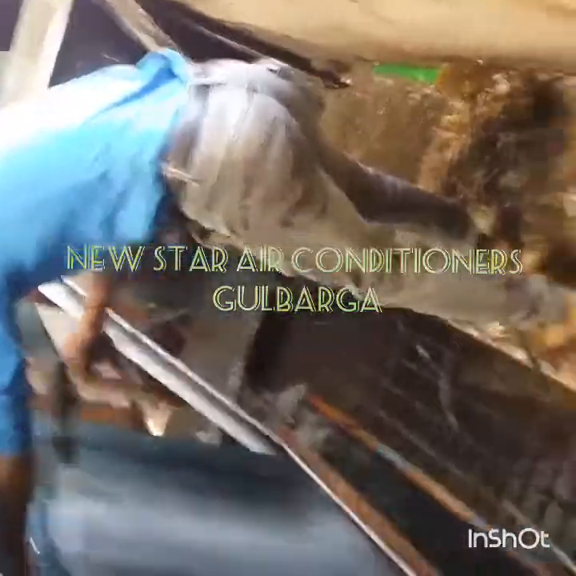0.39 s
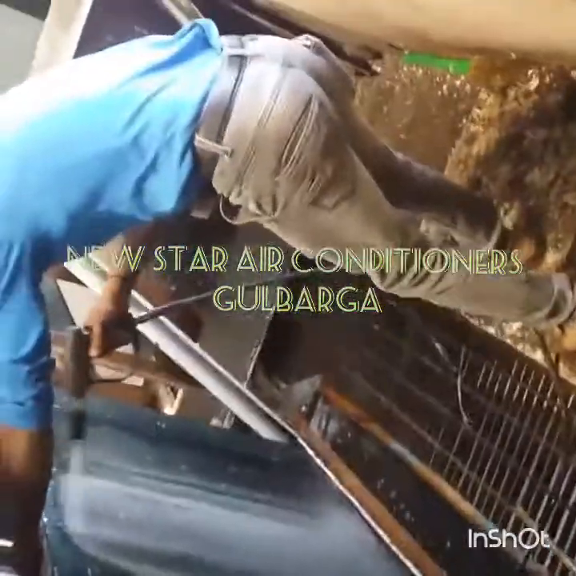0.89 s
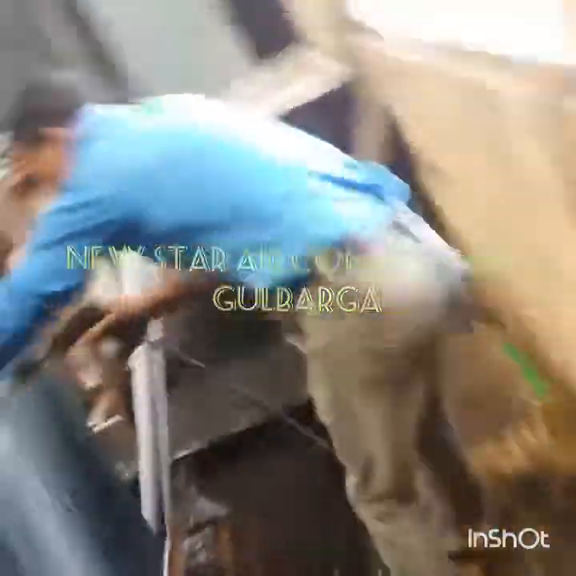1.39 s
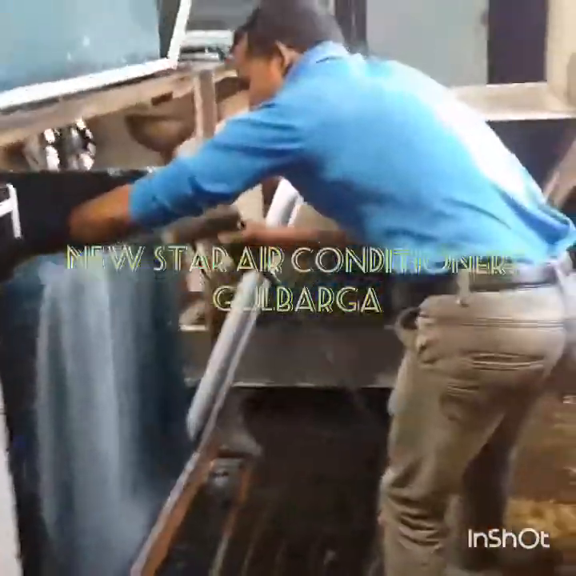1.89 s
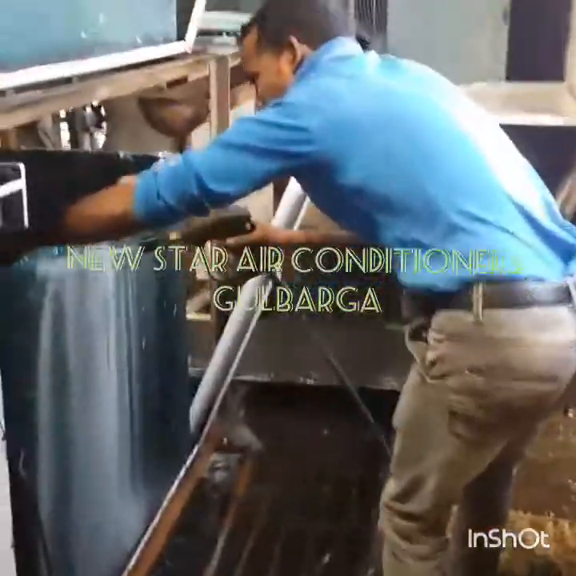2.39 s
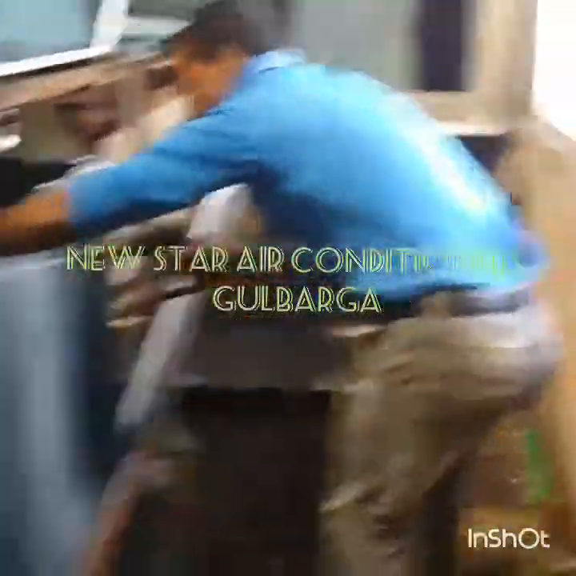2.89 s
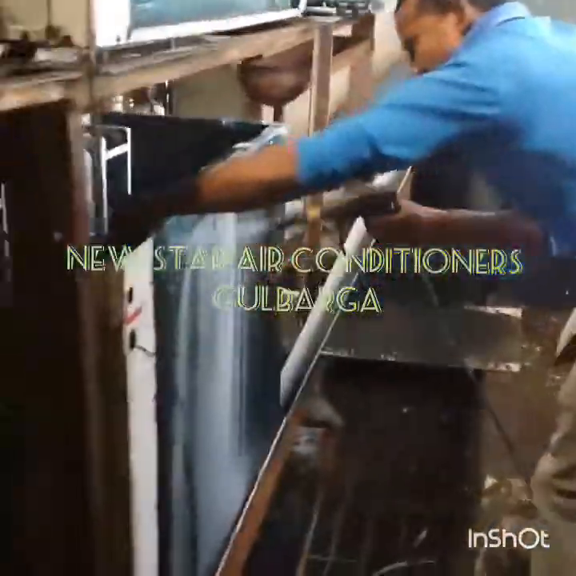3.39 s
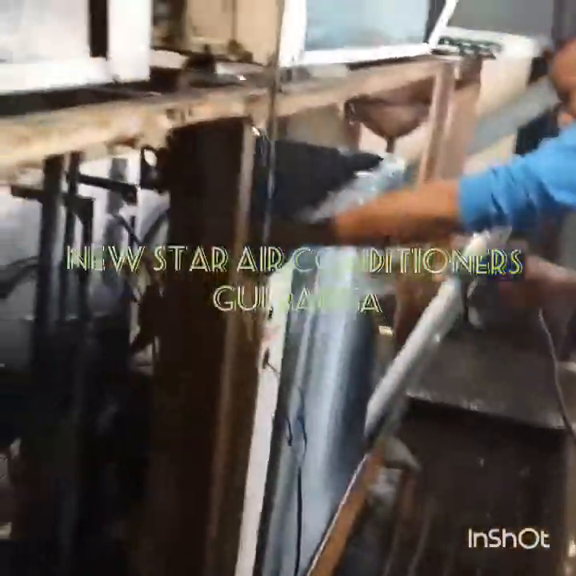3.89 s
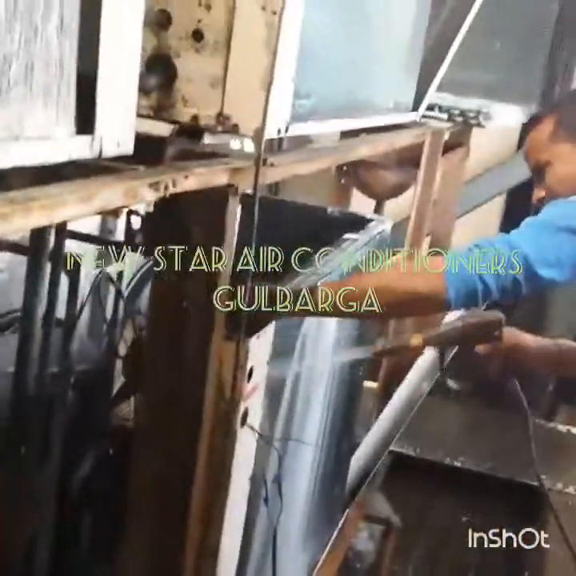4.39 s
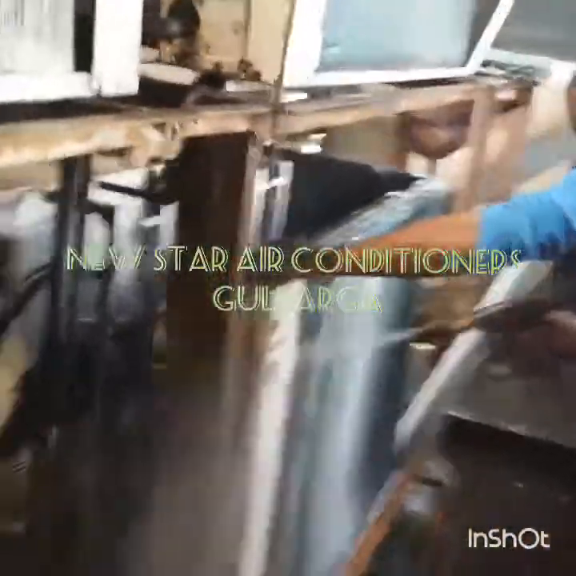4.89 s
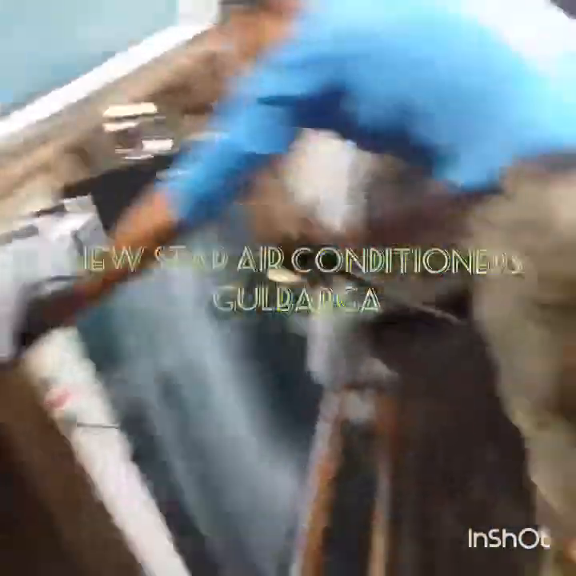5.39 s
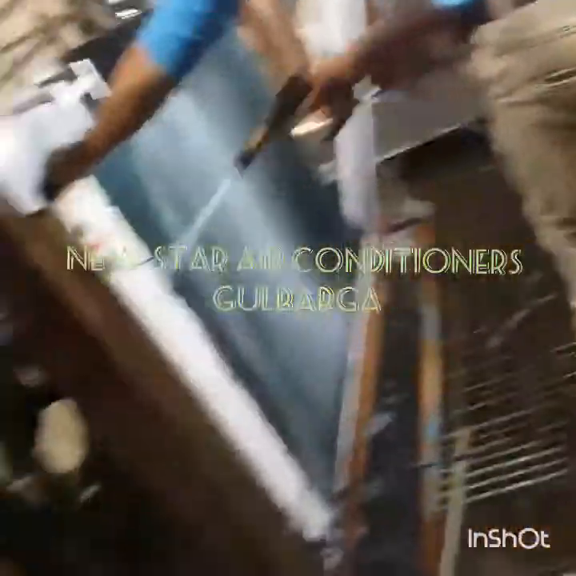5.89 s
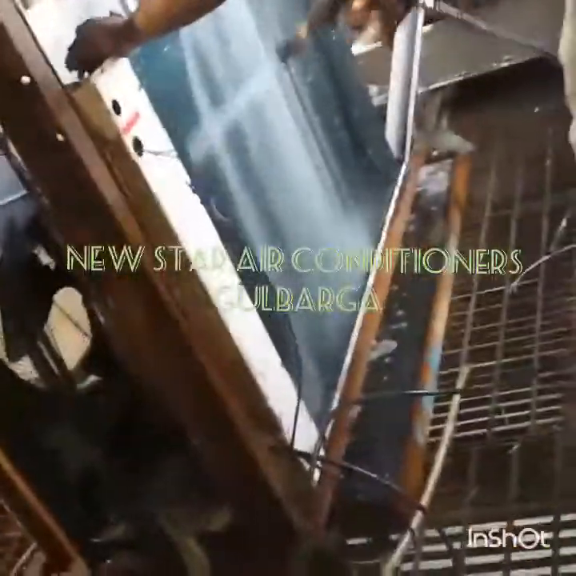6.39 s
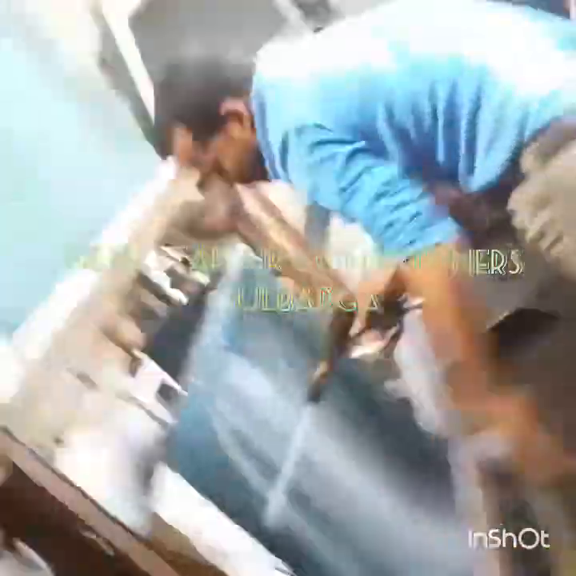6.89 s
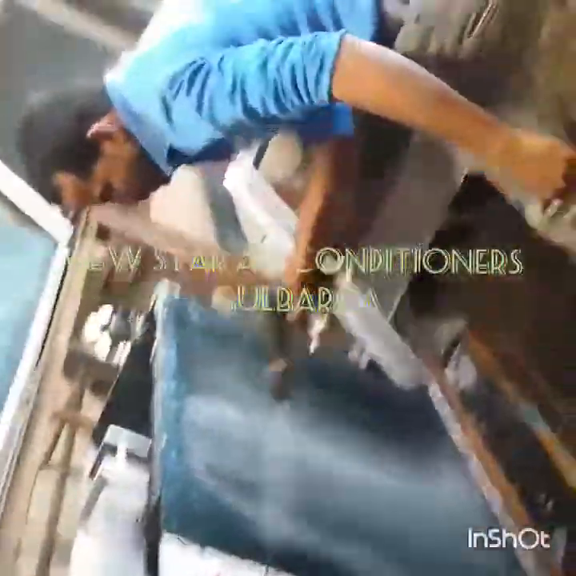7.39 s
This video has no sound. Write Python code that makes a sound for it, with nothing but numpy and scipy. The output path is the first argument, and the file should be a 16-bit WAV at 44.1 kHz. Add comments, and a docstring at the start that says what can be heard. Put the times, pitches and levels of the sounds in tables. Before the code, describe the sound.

A pressurised water jet hisses brightly over thin metal fins, briefly drumming on a sheet-metal casing, with run-off and a humming, whining pump behind.

```python
"""A hand sweeps a pressure washer's jet over the thin fins of an air conditioner coil, near a moving phone.
From the start, noise shaped into bands gives the hiss on the fins, the fizz of mist and the run-off;
behind it lie workshop noise and a pump made of steady sine tones. The hiss dips briefly, mostly early on.
Between 4.7 and 6 s the jet slips off the fins four times and the metal casing, a set of resonances, drums.
The hiss then goes on without the drumming, over run-off, workshop noise and pump; a low swell ends it."""
import sys
import numpy as np
from scipy import signal
from scipy.fft import rfft, irfft, next_fast_len
from scipy.io import wavfile
from scipy.ndimage import uniform_filter1d, map_coordinates

SR = 44100
rng = np.random.default_rng(int(sys.argv[2]) if len(sys.argv) > 2 else 0)


def master_out(mix):
    """Clip the mix to full scale and print it as 16-bit PCM to the path in sys.argv[1]."""
    frames = np.transpose(np.atleast_2d(mix))
    ceiling = np.clip(frames, -1, 1)
    pcm = np.round(ceiling * 32767).astype(np.int16)
    wavfile.write(sys.argv[1], SR, pcm)


def boost(x):
    """Linear amplitude factor 10**(x/20) for a level x in decibels (scalar or array-like)."""
    u = np.asarray(x, float) / 20
    return 10 ** u


N = 331191  # length in samples
T = np.arange(N) / SR  # time in s
SHAFT_HZ = 48.692  # turns of the pump shaft per second


def read(table):
    """Join the rows of a table by straight lines in time, one curve per column."""
    s, *columns = np.transpose(table)
    return [np.interp(T, s, column) for column in columns]


def over_hz(table, hz):
    """Read a spectrum with pitch spaced by ratio, much as the ear hears it."""
    table_hz, values = np.transpose(table)
    return np.interp(np.log(hz + 1), np.log(table_hz), values)


def walk(rate, count=1):
    """Slow random wandering: a new random level each 1 / rate s, joined by ramps; spread a little over 1."""
    hold = int(SR / rate)
    levels = rng.standard_normal((count, N // hold + 1))
    steps = np.repeat(levels, hold, axis=1)
    return 1.42 * uniform_filter1d(steps, hold, axis=1)[:, :N]


def noise():
    """Two unrelated channels of plain hiss."""
    return rng.standard_normal((2, N))


def droplets(spread_db):
    """Two unrelated showers with an impact at every sample, some harder than the rest."""
    hardness = np.minimum(rng.exponential(size=(2, N)), 5)
    return noise() * boost(spread_db * hardness)


def colour(x, table):
    """Filter two channels to a spectrum, then set each to rms 1."""
    size = next_fast_len(N)
    gain = boost(over_hz(table, np.fft.rfftfreq(size, 1 / SR)))
    y = irfft(rfft(x, size) * gain, size)[:, :N]
    return y / y.std(axis=1, keepdims=True)


def patches(x, depth_db, wide_hz, long_s):
    """Random bright and dull streaks in pitch and time, so that the noise has an uneven grain."""
    hz, s, z = signal.stft(x, SR, nperseg=1024, noverlap=768)
    grids = rng.standard_normal((2, 400, 400))
    place = np.meshgrid(hz / wide_hz, s / long_s, indexing="ij")
    streaks = np.array([map_coordinates(grid, place, order=1) for grid in grids])
    return signal.istft(z * boost(depth_db * streaks), SR, nperseg=1024, noverlap=768)[1][:, :N]


def ring(x, hz, width_hz):
    """One resonance, passing its centre pitch unchanged and weakening the rest."""
    return signal.lfilter(*signal.iirpeak(hz, hz / width_hz, SR), x)


def bumps(rows):
    """Smooth bumps in dB from rows of (t/s, level/dB, half length/s)."""
    return sum(db * np.exp(-((T - s) / long_s) ** 2) for s, db, long_s in rows)


# the jet slips off the fins onto the casing: leaves t/s, returns t/s, change on the fins level/dB,
# drumming level/dB, brightness in dB per octave
SLIPS = [(4.717, 5.28, -7.5, -39.5, -3), (5.454, 5.53, -10.5, -36, 5), (5.666, 5.757, -11, -38, -2),
         (5.922, 6.005, -9, -33.5, 7)]
SLIDE_S = 0.063  # time the jet takes to cross the edge
DRUM_LEAD_S, DRUM_TAIL_S = 0.02, 0.033  # the casing drums a little longer than the fins are quiet


def slipped(lead_s=0, tail_s=0):
    """For each slip a gate, 1 while the jet is off the fins, with ramps as it crosses the edge."""
    def edge(s):
        return np.clip(s / SLIDE_S + .5, 0, 1)
    return np.array([edge(T - off + lead_s) * edge(back + tail_s - T) for off, back, *_ in SLIPS])


# surroundings: t/s, low rumble level/dB, workshop murmur level/dB, wash level/dB
SURROUNDINGS = [(0.0, -49, -41.5, -42), (1.0, -44.5, -49, -42), (2.42, -48.5, -46.5, -40.5),
                (3.3, -62, -53, -46), (4.43, -69, -51, -46.5), (5.31, -57, -51, -45.5),
                (6.38, -60, -51, -40.5), (7.51, -58, -46, -42)]
# colours of the rumble, the murmur and the wash: f/Hz, relative level/dB
LOWS_COLOUR = [(25, -36), (45, -23), (65, 1.5), (100, -1), (140, -5), (250, -6.5), (500, -26.5)]
MURMUR_COLOUR = [(80, -19), (150, -5.5), (250, -4), (350, -1.5), (480, -1.5), (700, -17), (1200, -21)]
WASH_COLOUR = [(350, -27), (560, -7.5), (800, 1), (1050, 3.5), (1300, -1.5), (1700, -7), (2500, -28)]
# one low swell: t/s, f/Hz, gain level/dB, half length/s
SWELL = (7.45, 296, -20, .05)


def rumble():
    """Dull wavering noise at the bottom, the murmur and wash of the wet workshop, and one low swell."""
    lows_db, murmur_db, wash_db = read(SURROUNDINGS)
    lows = colour(noise(), LOWS_COLOUR) * boost(lows_db + .7 * walk(3.05))
    murmur = colour(patches(noise(), depth_db=4.5, wide_hz=86.6, long_s=0.329), MURMUR_COLOUR)
    wash = colour(patches(noise(), depth_db=5.25, wide_hz=90.3, long_s=.2), WASH_COLOUR)
    wash_db = wash_db + 0.5 * slipped().max(axis=0)  # slightly louder while the jet is on the casing
    s, hz, db, long_s = SWELL
    swell = ring(noise(), hz, 90) * boost(db) * np.exp(-((T - s) / long_s) ** 2)
    return lows + murmur * boost(murmur_db) + wash * boost(wash_db) + swell


# how strongly the pump is heard: t/s, added hum level/dB, added whine level/dB
PUMP_NEARNESS = [(0, 11, 7), (1.2, 6, 5), (2.2, 4, 7), (3.2, 2.5, 4.5), (4.2, 2.5, -0.5), (5.2, 1, 3),
                 (6.2, -1, 1), (7.51, 6.5, 7)]
# the pump's tones: multiple of the shaft rate, level/dB before the nearness is added
PUMP_TONES = [(2, -65), (3, -63), (4, -65), (5, -63), (6, -63), (7, -59), (8, -64), (9, -61), (11, -65),
              (12, -61), (14, -61), (17, -61), (18, -60), (26, -60), (27, -58), (28, -62), (31, -56),
              (32, -58), (33, -52), (34, -49), (35, -54), (36, -58), (37, -51), (38, -50), (39, -56),
              (40, -52), (41, -57), (42, -58), (43, -58), (46, -60), (47, -55), (50, -58)]


def pump():
    """Steady multiples of the shaft rate; each swells and fades as the phone moves among the echoes."""
    shaft_angle = 2 * np.pi * SHAFT_HZ * T
    hum_db, whine_db = read(PUMP_NEARNESS)
    out = np.zeros((2, N))
    for multiple, db in PUMP_TONES:
        high = min(multiple / 30, 1)  # near 0 for hum, 1 for whine
        # short waves differ between the ports and favour the left one
        start = rng.uniform(0, 2 * np.pi) + high * rng.uniform(-np.pi / 2, np.pi / 2, (2, 1))
        near_db = (1 - high) * hum_db + high * (whine_db + np.array([[.8], [-3.]]))
        fading_db = (1.5 + 0.97 * high) * walk(1.226, count=2)
        out += boost(db + near_db + fading_db) * np.sin(multiple * shaft_angle + start)
    return out


# run-off: t/s, trickle level/dB, splash level/dB
RUN_OFF = [(0.0, -34, -31.5), (1.38, -34, -33.5), (1.82, -31.5, -30.5), (2.3, -33.7, -27.5),
           (2.89, -35, -30), (3.25, -34.5, -30.5), (3.89, -39, -33), (4.6, -41, -30), (5.4, -39, -32),
           (6.2, -39, -33.5), (6.4, -34.5, -35.5), (7.03, -34, -36.5), (7.51, -33, -35.5)]
# colours of the trickle and the splash: f/Hz, relative level/dB
TRICKLE_COLOUR = [(900, -20), (1350, -8), (1750, -2), (2100, -4.5), (2500, -5.5), (3200, -18.5)]
SPLASH_COLOUR = [(1600, -29.5), (2200, -7.5), (2700, -0.5), (3100, -2), (3700, -4), (4200, -2.5),
                 (5500, -33)]


def water():
    """Run-off trickles and splashes in the low treble; the trickle is louder while the casing drums."""
    trickle_db, splash_db = read(RUN_OFF)
    off = slipped(DRUM_LEAD_S, DRUM_TAIL_S).max(axis=0)
    trickle = colour(patches(droplets(3.1), depth_db=4.5, wide_hz=121, long_s=.1), TRICKLE_COLOUR)
    splash = colour(patches(droplets(1.2), depth_db=4.5, wide_hz=131.9, long_s=.1), SPLASH_COLOUR)
    trickle_db = trickle_db + 7 * off + 0.53 * bumps(FOLDS) + 0.93 * walk(6)
    splash_db = splash_db - off + 1.55 * walk(6)
    return trickle * boost(trickle_db) + splash * boost(splash_db)


# resonances of the sheet metal: f/Hz, width f/Hz, level/dB
PANEL_MODES = [(383, 120, -7), (588, 45, 4.5), (805, 120, 3), (938, 53, 2.5), (1110, 140, 1),
               (1405, 110, -0.5), (1800, 110, -9)]
# the jet crosses a fold of the casing: t/s, level/dB over the drumming, half length/s
FOLDS = [(4.865, 13, 0.035), (5.12, 5.5, 0.035), (5.67, 7.5, 0.023)]


def casing():
    """The jet makes sheet metal ring at hollow pitches, whose balance wanders and differs from slip to slip."""
    impacts = droplets(1.1)
    on = slipped(DRUM_LEAD_S, DRUM_TAIL_S)
    *_, drum_db, bright_db = np.transpose(SLIPS)
    tilt_db = bright_db @ on
    modes = np.zeros((2, N))
    for hz, width_hz, db in PANEL_MODES:
        mode_db = db + tilt_db * np.log2(hz / 900) + 3.0 * walk(9.7)
        modes += boost(mode_db) * ring(impacts, hz, width_hz)
    modes = signal.sosfilt(signal.butter(2, 300, "high", fs=SR, output="sos"), modes)
    return modes / modes.std() * (boost(drum_db) @ on) * boost(bumps(FOLDS))


# the spray: t/s, jet on the fins level/dB, fine mist level/dB, coarse drops level/dB
SPRAY = [(0, -16.5, -20.5, -0.5), (.6, -18, -20.5, 0), (1.15, -16, -19, -3), (1.8, -15.5, -20.5, 3),
         (2.4, -14.5, -24.5, -1.5), (2.8, -15, -22.5, -2.5), (3.3, -14, -26.5, -11), (3.9, -17, -22.5, -3),
         (4.3, -16, -24, -0.5), (4.65, -18.5, -21, 5), (5.37, -16, -22.5, -0.5), (5.6, -15.5, -20, -0.5),
         (5.86, -12.5, -22.5, -1.1), (6.1, -15, -25, -1), (6.4, -15, -28.5, 0), (7.0, -18, -26, -3),
         (7.51, -18, -22.5, 3.5)]
# colours of the fins and the mist: f/Hz, relative level/dB
FINS_COLOUR = [(2500, -34.5), (3700, -22), (4600, -4.5), (5400, 0.5), (6300, 0), (7600, 0.5), (8500, -3.5),
               (10000, -8.5), (12500, -15)]
MIST_COLOUR = [(3000, -14), (4500, 2), (7000, 1), (9500, 9), (12000, 4.5), (14000, 5.5), (15500, 2)]
# the hiss dips briefly: t/s, level/dB
DIPS = [(0.1, -2.5), (0.22, -0.5), (0.375, -2), (1.06, -2.5), (1.19, -2.5), (1.32, -3.5), (1.42, -3.5),
        (1.525, -2), (1.645, -4.5), (1.77, -2.5), (1.9, -0.5), (2.22, -3), (2.5, -1), (2.8, -2), (2.97, -4),
        (3.03, -3.5), (4.41, -2.5), (6.57, -3)]
# steady narrow ridges in the hiss: f/Hz, width f/Hz, level/dB
RIDGES = [(6020, 350, -10.5), (7780, 205, -10.5)]


def jet():
    """Drops hiss on the fins under a fizz of mist; both share a quick flutter and the pump's pressure throb."""
    fins_db, mist_db, coarse_db = read(SPRAY)
    off = slipped()
    tremor_db = .5 * walk(16)[0]  # from the hand
    quick_db = tremor_db + bumps([(s, db, 0.022) for s, db in DIPS])
    slip_db = np.transpose(SLIPS)[2] @ off
    throb = 1 + .03 * np.cos(2 * np.pi * SHAFT_HZ * T)
    flutter = throb * boost(0.15 * walk(22) + 0.5 * walk(70))
    fins = colour(patches(droplets(1.6), depth_db=3.75, wide_hz=129.5, long_s=.12), FINS_COLOUR)
    # larger drops fill the lower edge of the hiss, more so while the jet is off the fins
    coarse_gain = boost(coarse_db + 5.5 * off.max(axis=0))
    fins = fins + (coarse_gain - 1) * ring(fins, 4400, 1170)
    fins = fins + sum(boost(db) * ring(fins, hz, width_hz) for hz, width_hz, db in RIDGES)
    mist = colour(patches(droplets(3.7), depth_db=1.95, wide_hz=247.0, long_s=0.15), MIST_COLOUR)
    # the mist follows a part of each change on the fins
    mist_db = mist_db + .45 * quick_db + 0.21 * slip_db
    return flutter * (fins * boost(fins_db + quick_db + slip_db) + mist * boost(mist_db))


# likeness of the noise at the two ports: f/Hz, likeness from 0 to 1
LIKENESS = [(60, 1), (130, 1), (300, 0.84), (650, 0.75), (1100, 0.36), (1500, 0), (6000, 0.25),
            (16000, 0.63)]
# the phone in the hand: t/s, lateness of the left port in ms, turn from 0 to 1, tilt from 0 to 1
FACING = [(0, -0.016, .02, 0.2), (.5, -0.0038, 0, .05), (1.2, -0.015, .05, 0.5), (1.7, 0.36, 0.67, 1),
          (2.4, 0.36, 0.63, 0.95), (3.1, 0.22, .6, 0.34), (4.1, .26, 1, 0), (5.15, 0.237, 0.95, 0.16),
          (5.6, -0.048, .3, 0.64), (6.3, -0.13, 0.28, 0.86), (7.51, -0.032, 0.06, 0.76)]
# each port favours its own ranges: f/Hz, left minus right level/dB,
# level/dB added by a full turn, level/dB added by a full tilt
PORT_BALANCE = [(875, 1, -1, 0), (1720, 6.5, 0.5, 1), (2980, 0.5, 3.5, 1), (4930, 5, 3.5, 5),
                (7600, -8, 0.5, 1), (10750, -9, 1.8, 8.5), (13500, -6.5, -29, 6)]


def ports(diffuse, tones):
    """Long waves reach both ports alike; each port favours its own ranges, which shift as the phone turns."""
    hz, s, (a, b, left, right) = signal.stft(np.vstack([diffuse, tones]), SR, nperseg=1024)
    alike = np.clip(over_hz(LIKENESS, hz), 0, 1)[:, None]
    blend = np.arcsin(alike) / 2  # mixing angle that makes two unrelated noises this alike
    a, b = a * np.cos(blend) + b * np.sin(blend), a * np.sin(blend) + b * np.cos(blend)
    at = np.minimum(s * SR, N - 1).astype(int)
    lag_ms, turn, tilt = (curve[at] for curve in read(FACING))
    lag_s = (lag_ms + 0.04 * walk(3)[0, at]) / 1000
    # the treble arrives at one port first; the bass of the room has no direction
    lagging_hz = hz * np.clip(hz / 1200 - .6, 0, 1)
    a = a * np.exp(-2j * np.pi * np.outer(lagging_hz, lag_s))
    port_hz, *pans = np.transpose(PORT_BALANCE)
    still_db, turn_db, tilt_db = (over_hz(np.c_[port_hz, pan], hz)[:, None] for pan in pans)
    pan_db = still_db + turn_db * turn + tilt_db * tilt
    share = 1 / (1 + boost(-2 * pan_db))  # part of the power that goes left
    z = np.array([(a + left) * np.sqrt(2 * share), (b + right) * np.sqrt(2 - 2 * share)])
    return signal.istft(z, SR, nperseg=1024)[1][:, :N]


def scene():
    """Surroundings, run-off, casing and jet reach the ports as noise, the pump as tones."""
    return ports(rumble() + water() + casing() + jet(), pump())


def roll_off(x):
    """The treble ends steeply here."""
    return signal.sosfilt(signal.butter(12, 15490, fs=SR, output="sos"), x)


def record(dry):
    """The phone cuts the deepest bass, rounds the highest peaks and cuts the top."""
    no_bass = signal.sosfilt(signal.butter(2, 42, "high", fs=SR, output="sos"), dry)
    rounded = np.tanh(0.72 * no_bass) / 0.68
    mix = signal.sosfilt(signal.ellip(12, .3, 80, 15450, fs=SR, output="sos"), rounded)
    return roll_off(mix)


dry = scene()
out = record(dry)
master_out(out)
```